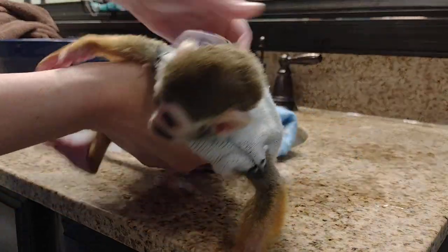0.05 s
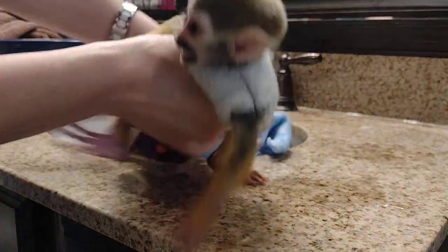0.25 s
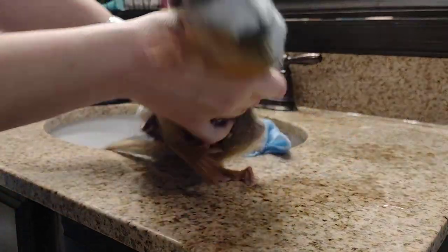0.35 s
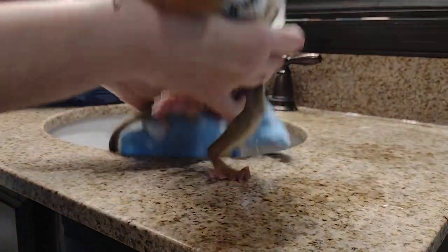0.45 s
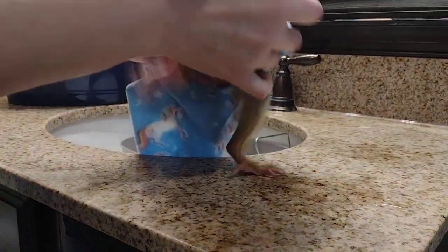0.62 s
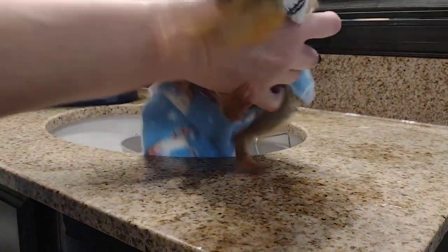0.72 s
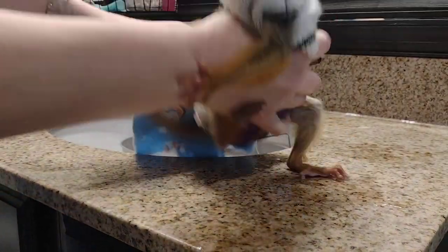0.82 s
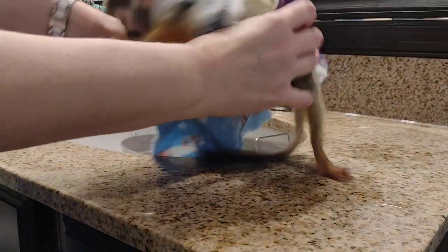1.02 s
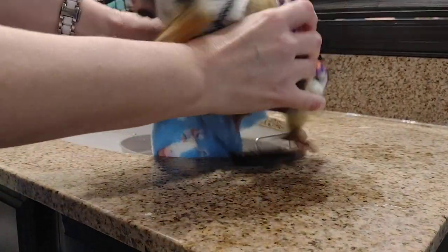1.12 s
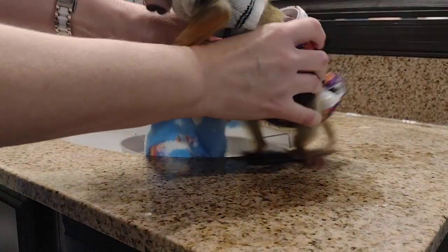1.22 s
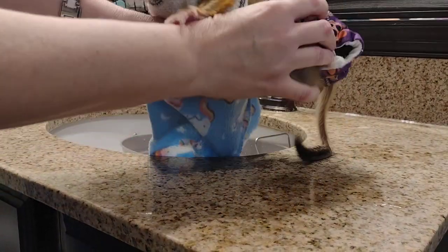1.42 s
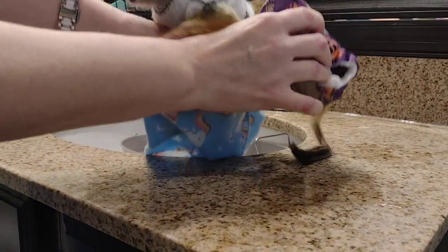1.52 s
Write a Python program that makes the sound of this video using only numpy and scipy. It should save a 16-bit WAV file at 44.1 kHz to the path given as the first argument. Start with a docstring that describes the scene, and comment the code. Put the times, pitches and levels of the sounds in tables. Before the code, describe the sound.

Close stereo microphone in a small reflective room: a baby monkey's shrill peep jumps up, holds and drops, stronger on the left, then quiet handling rustles, soft low thumps and a barely audible high squeak.

```python
"""A baby monkey's loud whistled peep arches up and falls as it is lifted over a stone counter.
The room is small and hard-walled; the voice reaches a two-port microphone direct and by reflections.
Two faint, thin squeaks, one before the peep and one from its end onward, are gliding sine tones like it.
Decaying low modes make soft counter thumps; shaped noise makes taps and the rustle of hands and cloth.
Behind them lie steady hiss, rumble and a low wavering hum."""
import sys
import numpy as np
from scipy import signal
from scipy.fft import rfft, irfft
from scipy.io import wavfile
from scipy.ndimage import uniform_filter1d, minimum_filter1d

SR = 44100
rng = np.random.default_rng(int(sys.argv[2]) if len(sys.argv) > 2 else 0)


def to_wav(sig):
    """Store sig (one row per channel, or 1-D mono) as 16-bit WAV at the path in sys.argv[1].

    Samples outside -1..1 are clipped; the rate is SR.
    """
    pcm = np.clip(np.atleast_2d(sig), -1, 1) * 32767
    pcm = np.round(pcm).astype(np.int16)
    wavfile.write(sys.argv[1], SR, pcm.T)  # frames by channels


N = 68355
TIME = np.arange(N) / SR


def amp(db):
    """Decibels to gain."""
    return 10 ** (np.asarray(db) / 20)


def unit(x):
    """Scales to rms 1."""
    return x / np.sqrt(np.mean(x ** 2) + 1e-20)


def read(points, hz):
    """Reads a (frequency, value) table on a log-frequency axis."""
    f, value = np.transpose(points)
    return np.interp(np.log(hz + 1), np.log(f + 1), value)


def add(mix, s, sound):
    """Mixes a sound in at time s, cut off at the end of the mix."""
    part = mix[:, max(round(s * SR), 0):][:, :sound.shape[-1]]
    part += sound[..., :part.shape[1]]


def drift(rate_hz):
    """Random wander of rms 1, smoothed above rate_hz."""
    hz = np.fft.rfftfreq(N, 1 / SR)
    spectrum = rfft(rng.standard_normal(N)) / (1 + (hz / rate_hz) ** 4)
    return unit(irfft(spectrum, N))


def bell(centre_s, width_s):
    """Gaussian swell that peaks at 1; width_s is its standard deviation."""
    return np.exp(-.5 * ((TIME - centre_s) / width_s) ** 2)


# How alike the left and right ports hear noise: (frequency [Hz], likeness [0 to 1])
PORT_LIKENESS = [(30, 0.392), (120, .9), (300, .55), (700, .15), (16000, .1)]


def noise(spectrum, tilt_db=0):
    """Stereo noise of rms 1 with a given colour and tilt [dB per octave], wide in the treble."""
    hz = np.fft.rfftfreq(N, 1 / SR)
    a, b = rfft(rng.standard_normal((2, N)))
    same = np.clip(read(PORT_LIKENESS, hz), -1, 1)
    pair = np.array([a, same * a + np.sqrt(1 - same ** 2) * b])
    colour = amp(read(spectrum, hz) + tilt_db * np.log2(hz + 1))
    return unit(irfft(pair * colour, N))


ATTACK_S, RELEASE_S = .0015, .0018
JITTER, JITTER_HZ, SHIMMER_DB = .0035, 120, .5  # rms pitch fraction, wander rate, rms level wander


def whistle(curve):
    """Phase and loudness of a slightly unsteady whistle that follows a curve."""
    s, hz, db = np.transpose(curve)
    glide = uniform_filter1d(np.interp(TIME, s, hz), size=130)
    pitch = glide * (1 + JITTER * drift(JITTER_HZ))
    gate = np.clip((TIME - s[0]) / ATTACK_S, 0, 1) * np.clip((s[-1] - TIME) / RELEASE_S, 0, 1)
    loudness = amp(np.interp(TIME, s, db) + SHIMMER_DB * drift(JITTER_HZ))
    level = np.sin(gate * np.pi / 2) ** 2 * loudness
    return 2 * np.pi * np.cumsum(pitch) / SR, np.sqrt(2) * level  # sine peak is root 2 times its rms


# The peep at its source: (time [s], pitch [Hz], relative level [dB])
PEEP_CURVE = [(.226, 7030, -20.5), (.236, 7190, -12.5), (.246, 7680, -9.5), (.254, 8870, -20),
              (.264, 9480, -15), (.278, 9890, -17.5), (.300, 9860, -19.5), (.328, 9940, -11),
              (.362, 9930, -11.5), (.390, 10070, -10.5), (.430, 9826, -15.5), (.470, 9542, -14.5),
              (.492, 9392, -14.5), (.510, 8883, -10.5), (.514, 8170, -16), (.518, 7060, -30.5)]
# Air puffs where the voice breaks upward and where it stops: (time [s], relative level [dB])
AIR_PUFFS = [(.246, -53.5), (.516, -43.5)]
# Colour of the rushing air: (frequency [Hz], relative density [dB per Hz])
AIR_COLOUR = [(2000, -30), (3800, -15.5), (4900, 0), (9000, 4), (11000, -16), (16000, -25.5)]
TONE_DB, OVERTONE_DB = .5, -18  # tone gain; octave against the fundamental
AIR_DB, PUFF_S = -50.5, .0026  # air gain on the whistle's loudness; puff standard deviation


def peep():
    """A nearly pure tone with a weak octave and a trace of rushing air, which puffs at the breaks."""
    phase, level = whistle(PEEP_CURVE)
    tone = amp(TONE_DB) * level * (np.sin(phase) + amp(OVERTONE_DB) * np.sin(2 * phase))
    puffs = sum(amp(db) * bell(s, PUFF_S) for s, db in AIR_PUFFS)
    flow = amp(AIR_DB) * level + puffs
    return tone + flow * noise(AIR_COLOUR)[0]


# The thin squeaks at their source, one curve each: (time [s], pitch [Hz], relative level [dB])
SQUEAK_CURVES = [
    [(.135, 13300, -65), (.185, 13280, -73), (.225, 13200, -66)],
    [(.45, 14100, -81), (.50, 14200, -70.5), (.56, 14150, -65), (.61, 13500, -65), (.665, 13970, -62),
     (.70, 13500, -67), (.735, 11870, -75)],
]


def squeak():
    """Very thin, high pure tones: one just before the peep, one from its end onward."""
    return sum(level * np.sin(phase) for phase, level in map(whistle, SQUEAK_CURVES))


LEFT_DB, RIGHT_DB = 2.5, -6.5
PORT_DELAY_MS = .031  # the voice reaches the right port later


def direct(x):
    """The straight path: louder and a little earlier at the left port."""
    hz = np.fft.rfftfreq(N, 1 / SR)
    lag = np.exp(-2j * np.pi * hz * PORT_DELAY_MS / 1000)
    late = irfft(rfft(x) * lag, N)
    return np.array([amp(LEFT_DB) * x, amp(RIGHT_DB) * late])


# How long the room rings: (frequency [Hz], 60 dB decay time [s])
ROOM_DECAY = [(100, .4), (1000, .45), (7000, 0.29), (8500, 0.3), (10000, .32), (15000, 0.18)]
ROOM_DB, ROOM_DELAY_S, ROOM_BUILD_S = -1.5, .003, .002
ROOM_LENGTH_S, ROOM_FADE_S = .3, .13  # the last reflections fade out


def room(x):
    """Dense reflections from near walls, each band dying at its own speed."""
    hz, t, z = signal.stft(rng.standard_normal((2, SR)), SR, nperseg=256)
    decay = amp(-60 * t / read(ROOM_DECAY, hz)[:, None])
    tail = signal.istft(z * decay, SR, nperseg=256)[1][:, :SR]
    age = TIME[:SR]
    build = np.clip((age - ROOM_DELAY_S) / ROOM_BUILD_S, 0, 1)
    fade = np.clip((ROOM_LENGTH_S - age) / ROOM_FADE_S, 0, 1)
    tail = tail * build * fade
    tail /= np.linalg.norm(tail[0])
    return amp(ROOM_DB) * signal.fftconvolve(x[None], tail, axes=1)[:, :N]


# Blows on the counter: (time [s], relative level [dB], knock against the boom [dB])
COUNTER_THUMPS = [(.001, -56, -23), (0.168, -52.5, -21), (.291, -48.5, -5.5), (.403, -58.5, -34),
                  (.910, -49.5, -16), (1.269, -54, -13.5), (1.315, -60, -24.5)]
# What the counter rings with: (frequency [Hz], relative level [dB], 60 dB decay time [s])
COUNTER_MODES = [(94, -0.5, 0.32), (103, -0.5, 0.57), (128, -1, .28), (153, -10.5, 0.32),
                 (232, -19.5, 0.37)]
# Colour of the dull knock: (frequency [Hz], relative density [dB per Hz])
KNOCK_COLOUR = [(60, -24.5), (190, -4), (400, 1), (700, -4), (1200, -15), (3000, -35.5), (16000, -59)]
BOOM_RISE_S, KNOCK_RISE_S, KNOCK_T60_S = .0095, .0026, .24


def thumps():
    """Soft blows ring the counter's low modes, with a short dull knock."""
    out = np.zeros((2, N))
    for s, db, knock_db in COUNTER_THUMPS:
        boom = np.zeros(N)
        for hz, mode_db, t60 in COUNTER_MODES:
            phase = 2 * np.pi * hz * TIME + .5 * rng.standard_normal()
            boom += amp(mode_db - 60 * TIME / t60) * np.sin(phase)
        knock = amp(knock_db - 60 * TIME / KNOCK_T60_S) * noise(KNOCK_COLOUR)
        boom = np.minimum(TIME / BOOM_RISE_S, 1) * boom
        knock = np.minimum(TIME / KNOCK_RISE_S, 1) * knock
        add(out, s, amp(db) * (boom + knock))
    return out


# Light touches of fingers and feet: (time [s], relative level [dB], centre pitch [Hz])
LIGHT_TAPS = [(0.379, -57.5, 2955), (0.734, -60.5, 3430), (0.881, -56, 1250), (1.095, -58.5, 5500)]
TAP_RISE_S, TAP_SKIRT = .002, 2 ** 3.2  # time to peak; frequency ratio at which a tap is 35 dB down


def taps():
    """Tiny contacts, each a brief noise burst around one pitch."""
    out, age = np.zeros((2, N)), TIME / TAP_RISE_S
    for s, db, hz in LIGHT_TAPS:
        burst = noise([(hz / TAP_SKIRT, -35), (hz, 0), (hz * TAP_SKIRT, -35)])
        add(out, s, amp(db) * age * np.exp(1 - age) * burst)
    return out


# Steady rubbing between the brushes: (time [s], level [dB])
RUBBING = [(0, -66), (.2, -64.5), (.74, -62), (.78, -68), (.848, -75), (.87, -67.5), (1.2, -63.5),
           (1.38, -63.5), (1.55, -62)]
# Hand brushing cloth: (peak time [s], standard deviation [s], peak level [dB], tilt [dB per octave])
CLOTH_BRUSHES = [(0.138, .024, -52.5, 2), (0.395, .022, -63, -1.5), (0.483, 0.029, -56, 2),
                 (0.681, 0.032, -52.5, 8.5), (0.861, .009, -65.5, -3), (1.004, .04, -62, 1),
                 (1.103, 0.037, -60, -1), (1.462, .026, -56.5, 0)]
# Colour of skin on cloth: (frequency [Hz], relative density [dB per Hz])
CLOTH_COLOUR = [(200, -22), (450, -7), (850, -7.5), (1200, -6), (1600, -1), (1850, -4.5), (2400, -1.5),
                (3100, -9.5), (4200, -7.5), (5200, -5), (6200, -5.5), (7200, -3), (8500, -7.5),
                (11000, -11.5), (13500, -14.5), (16000, -15.5)]


def rustle():
    """Grainy friction of skin and cloth: steady rubbing and brief brushes."""
    out = amp(np.interp(TIME, *np.transpose(RUBBING))) * noise(CLOTH_COLOUR)
    for s, width_s, db, tilt_db in CLOTH_BRUSHES:
        out += amp(db) * bell(s, width_s) * noise(CLOTH_COLOUR, tilt_db)
    grain_db = 1.3 * drift(rate_hz=300)
    return out * amp(grain_db)


# Colour of the room hiss: (frequency [Hz], relative density [dB per Hz])
HISS_COLOUR = [(25, -7.5), (100, -1.5), (280, 7), (500, -2.5), (800, -6.5), (1700, -5.5), (3300, -6),
               (5000, -7), (7500, -4.5), (11000, -6.5), (16000, -11)]
# Colour of the low rumble: (frequency [Hz], relative density [dB per Hz])
RUMBLE_COLOUR = [(30, -32.5), (70, -12.5), (100, -5), (140, -5), (190, -13.5), (600, -18), (1500, -35),
                 (16000, -78)]
# The hum's tones before flutter: (frequency [Hz], level [dB])
HUM_TONES = [(119, -72), (245, -74.5)]
HISS_DB, RUMBLE_DB = -68.5, -71.5
HUM_WAVER, HUM_FLUTTER = .96, .33  # rms phase wander [radians], rms level wander [fraction]


def background():
    """Room hiss, a low rumble and a hum that wavers in phase and level."""
    hum = np.zeros(N)
    for hz, db in HUM_TONES:
        flutter = 1 + HUM_FLUTTER * drift(rate_hz=10)
        phase = 2 * np.pi * hz * TIME + HUM_WAVER * drift(rate_hz=15)
        hum += amp(db) * np.sqrt(2) * flutter * np.sin(phase)
    return amp(HISS_DB) * noise(HISS_COLOUR) + amp(RUMBLE_DB) * noise(RUMBLE_COLOUR) + hum


def scene():
    """The monkey's voice in its room, with the handling noises around it."""
    voice = peep() + squeak()
    return direct(voice) + room(voice) + thumps() + taps() + rustle() + background()


# Microphone response: (frequency [Hz], gain [dB])
MIC_RESPONSE = [(20, -3.5), (15300, 0), (15800, -4.5), (16100, -25), (20000, -47)]
LOW_CUT_HZ, EDGE_HZ = 62, 16800
CEILING, LIMIT_S = .95, .004  # limiter's peak level and smoothing time


def record(dry):
    """The microphone's bass cut and top-end roll-off, a smooth peak limiter and the band limit."""
    cut = signal.sosfilt(signal.butter(2, LOW_CUT_HZ, "high", fs=SR, output="sos"), dry)
    response = amp(read(MIC_RESPONSE, np.fft.rfftfreq(2 * N, 1 / SR)))
    coloured = irfft(rfft(cut, 2 * N) * response)[:, :N]
    span = round(LIMIT_S * SR)
    peak = abs(coloured).max(0)
    gain = minimum_filter1d(CEILING / np.maximum(peak, CEILING), 2 * span)
    limited = coloured * uniform_filter1d(uniform_filter1d(gain, span), span)
    band_limit = signal.firwin(511, EDGE_HZ, window=("kaiser", 9), fs=SR)
    return signal.oaconvolve(limited, band_limit[None], "same")


dry = scene()
out = record(dry)
to_wav(out)
```